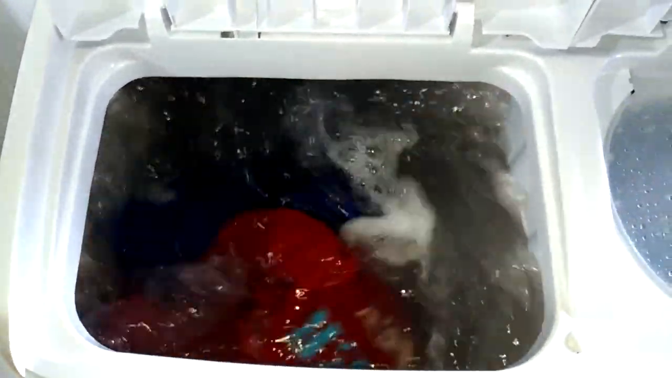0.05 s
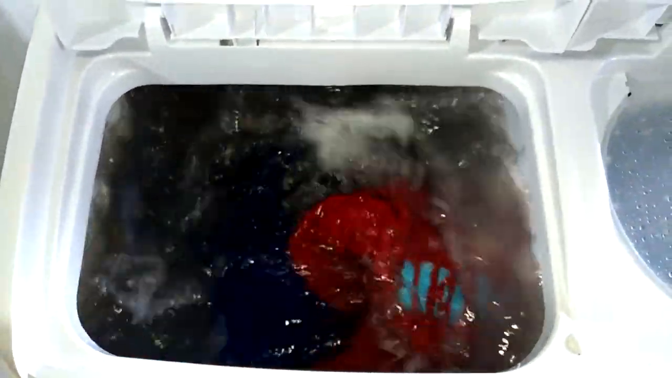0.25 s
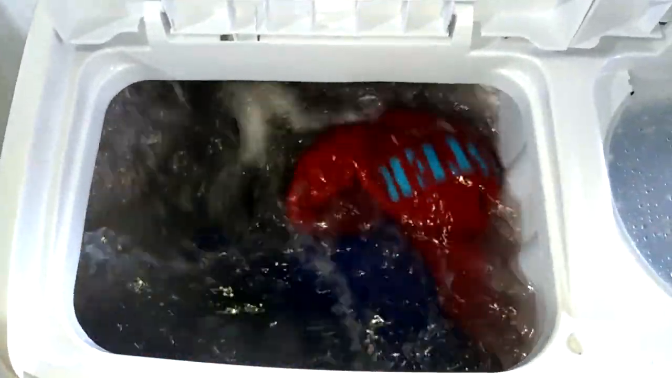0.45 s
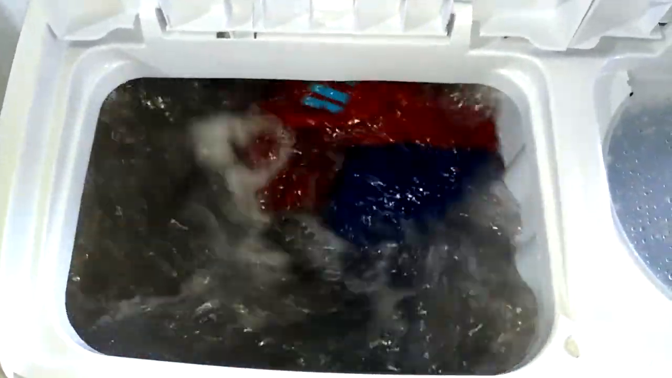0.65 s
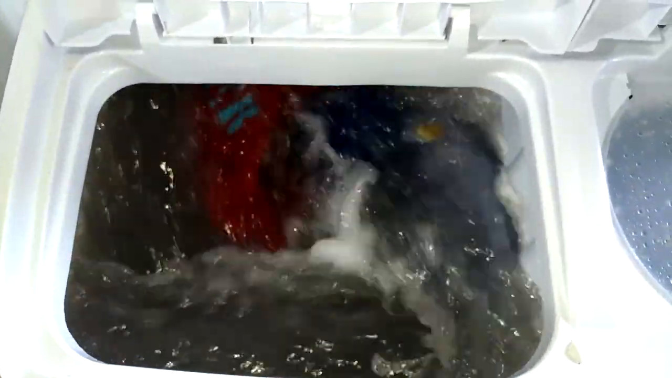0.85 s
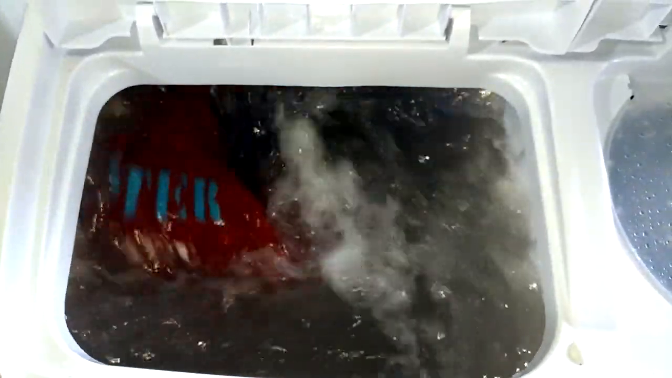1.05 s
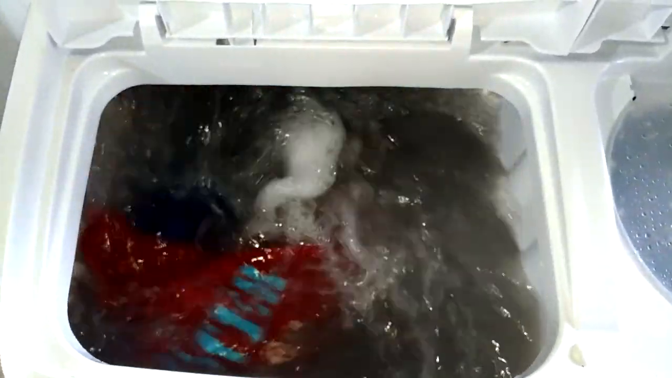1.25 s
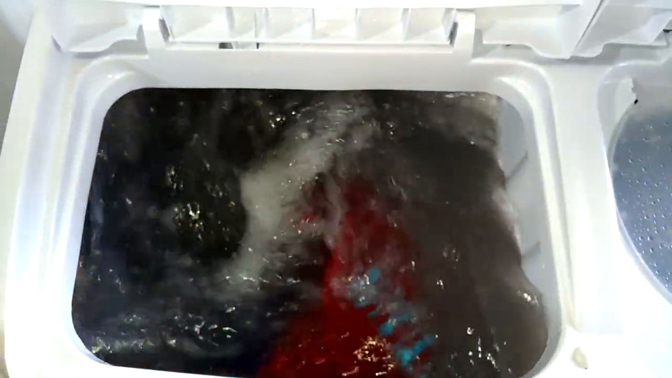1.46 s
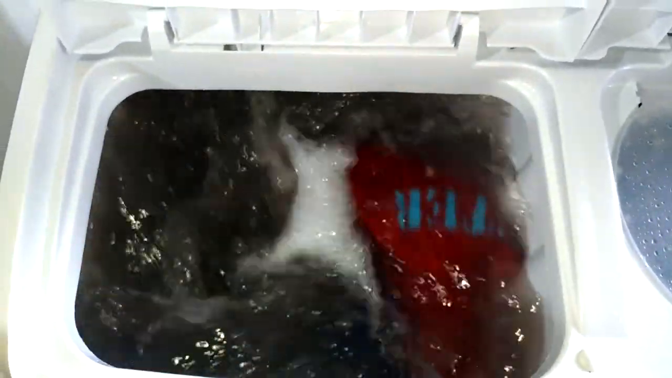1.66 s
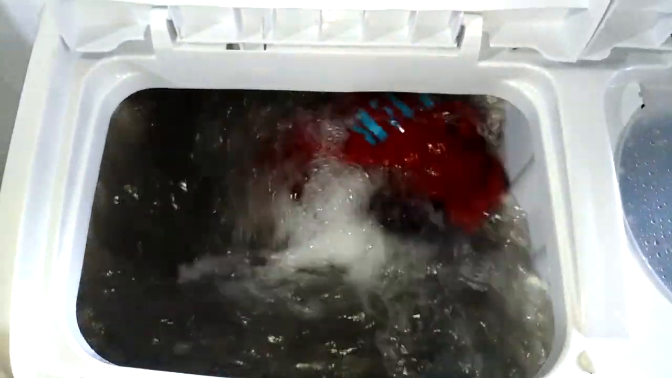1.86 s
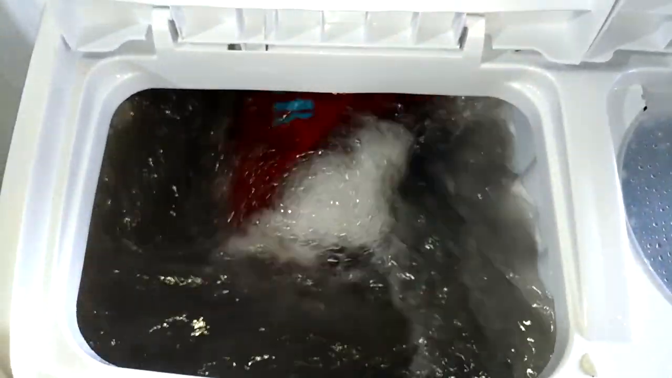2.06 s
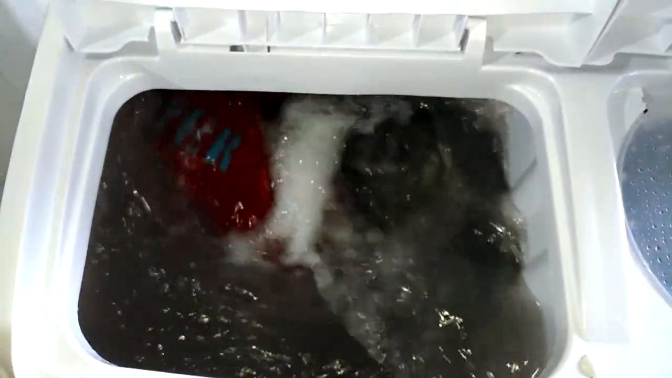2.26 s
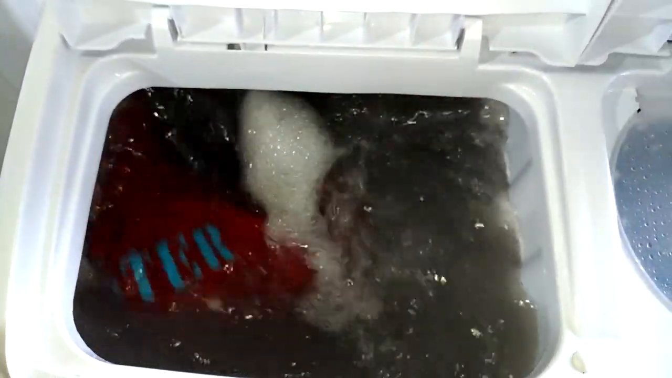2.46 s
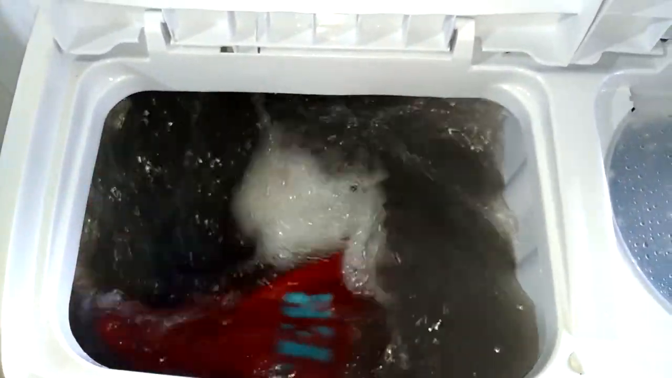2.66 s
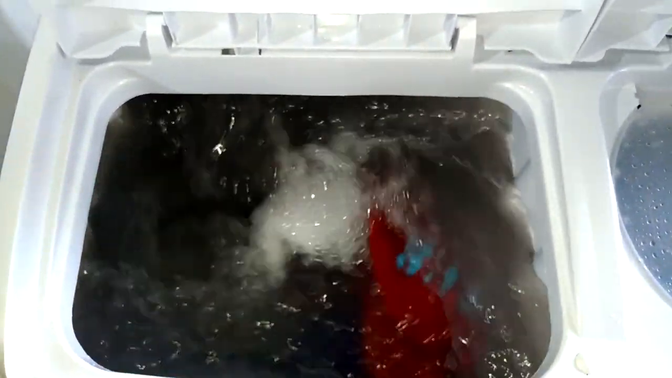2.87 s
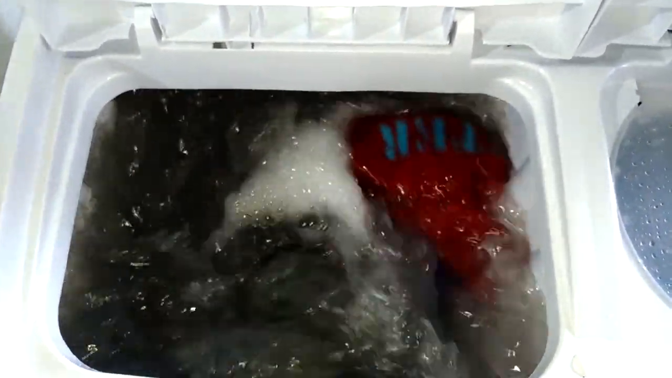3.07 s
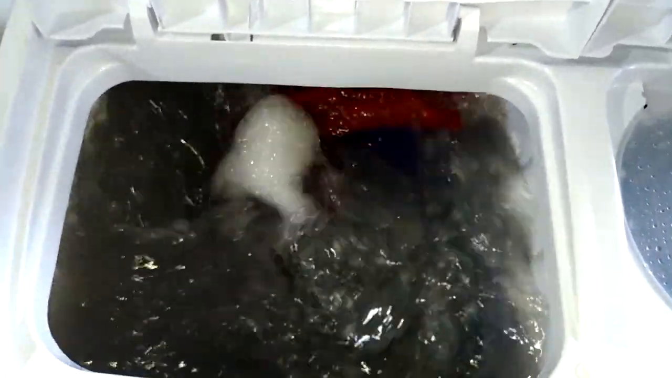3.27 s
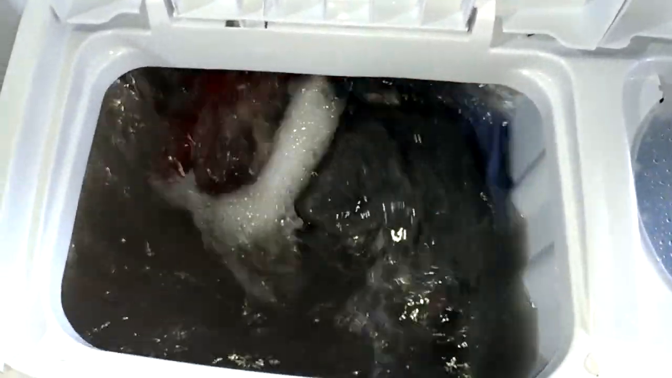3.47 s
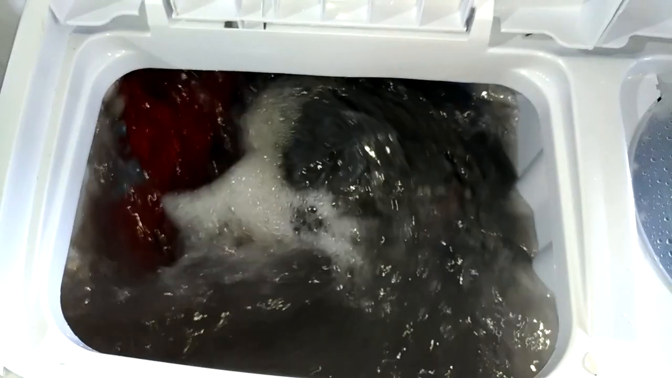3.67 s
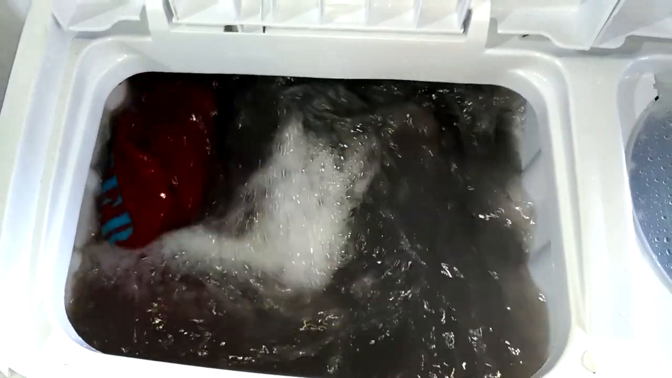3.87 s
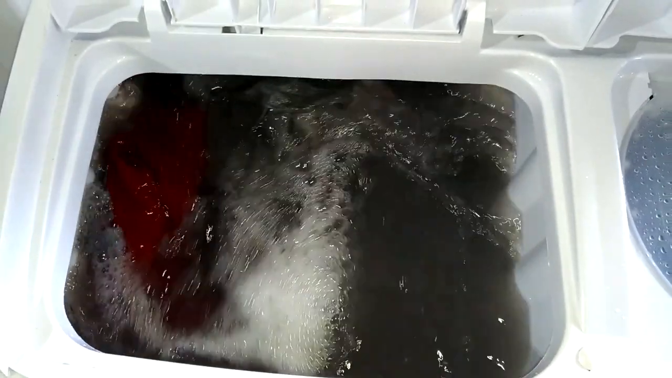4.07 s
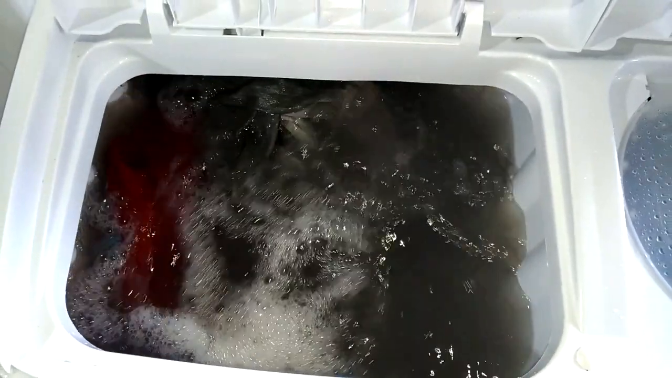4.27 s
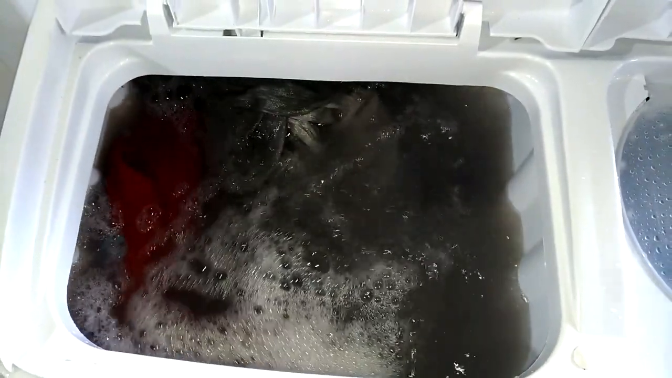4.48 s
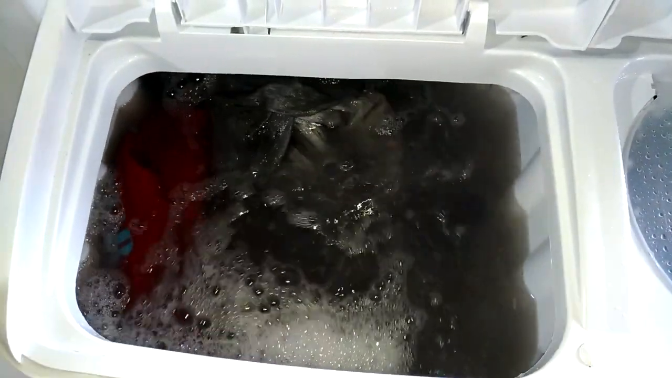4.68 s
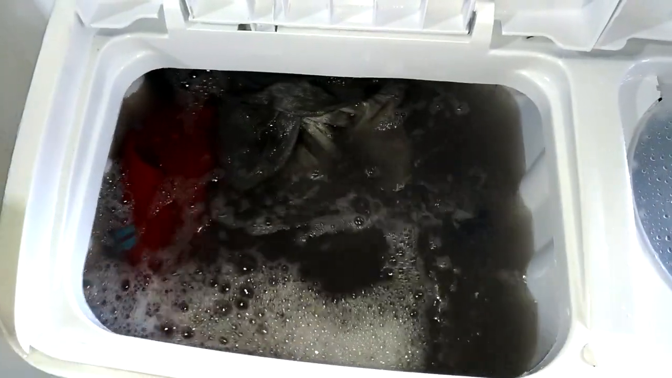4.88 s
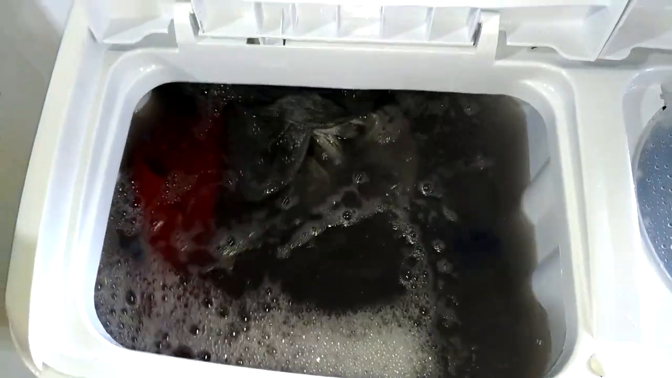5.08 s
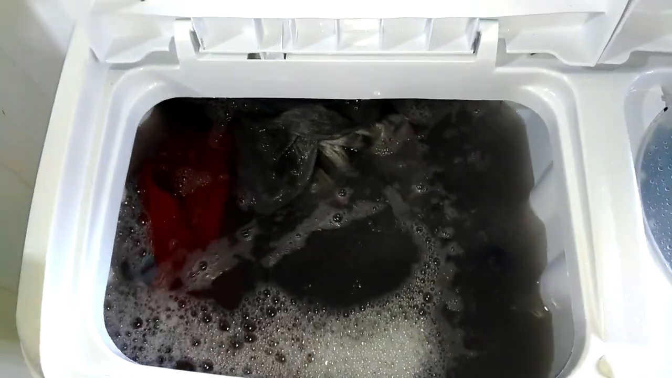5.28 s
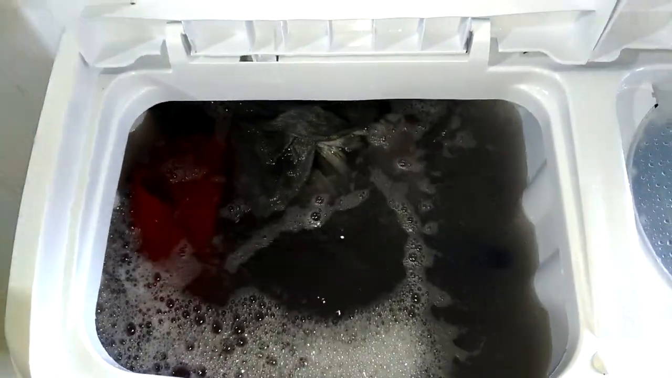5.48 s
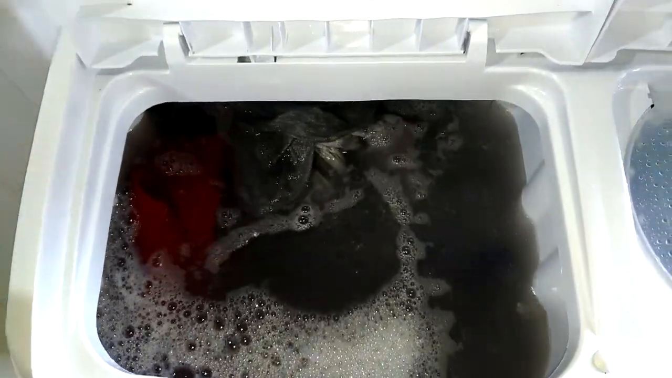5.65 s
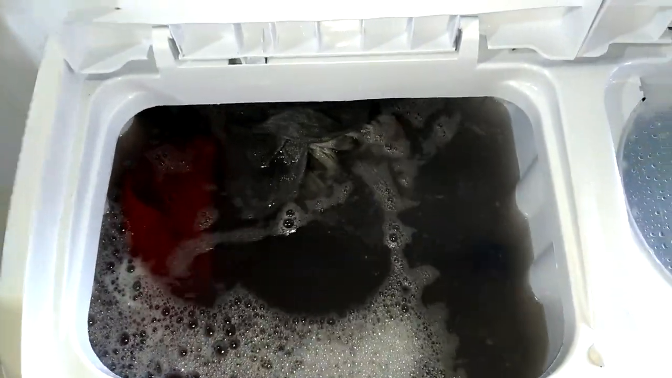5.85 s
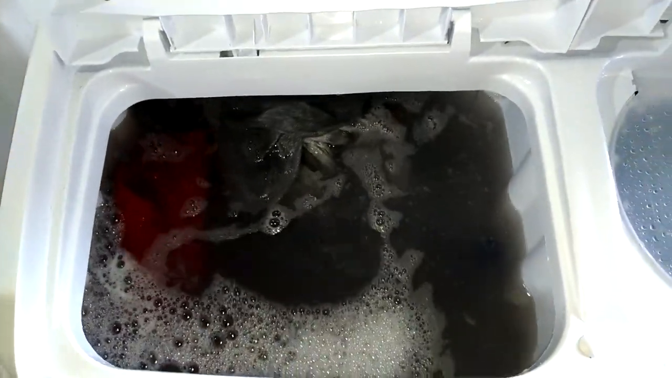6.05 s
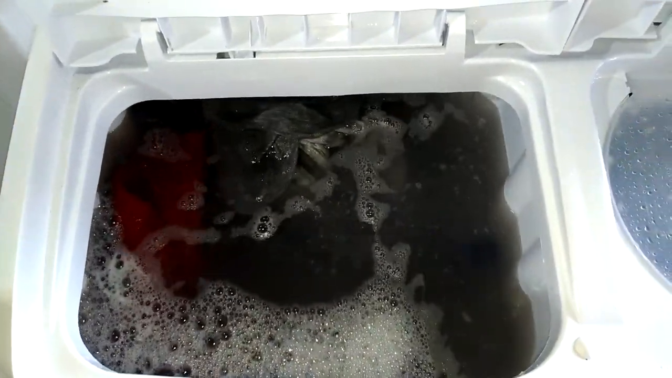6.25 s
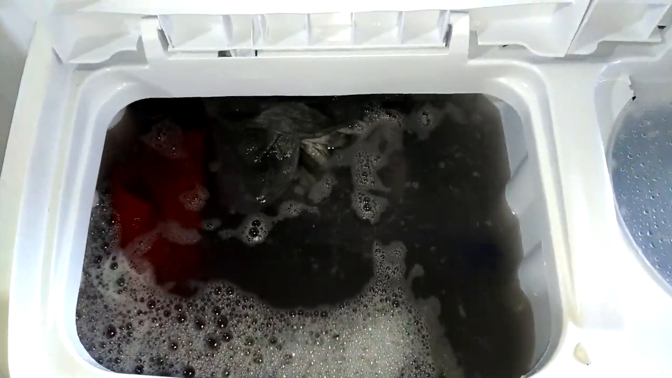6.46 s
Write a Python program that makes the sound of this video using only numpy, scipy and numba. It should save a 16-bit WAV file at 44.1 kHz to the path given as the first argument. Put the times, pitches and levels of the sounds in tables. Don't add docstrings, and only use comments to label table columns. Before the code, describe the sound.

Stereo microphones held just above the tub catch lively, irregular splashing, plops and deep gulps over a motor's hum and cabinet rumble. The motor stops about halfway through; one last heavy slosh follows, then trickles and small drips fade within a second. The rest is nearly silent: soft room air, electric hum, a small distant engine slowly speeding up, and occasional dull taps and scuffs.

```python
import sys
import numpy as np
from scipy import signal
from scipy.fft import rfft, irfft
from scipy.io import wavfile
from numba import njit

SR = 44100
rng = np.random.default_rng(int(sys.argv[2]) if len(sys.argv) > 2 else 0)


def generate_wav(signal):
    frames = np.transpose(np.atleast_2d(signal))
    scaled = np.clip(frames, -1, 1) * 32767
    pcm = np.round(scaled).astype(np.int16)
    wavfile.write(sys.argv[1], SR, pcm)


def how_loud(loudness_db):
    steps = np.asarray(loudness_db, float) / 20
    return 10 ** steps


N = 287532
PORT_LAG = 18


def rms_one(x):
    return x / np.sqrt(np.mean(x ** 2) + 1e-20)


def in_time(rows):
    s, value = np.transpose(rows)
    return np.interp(np.arange(N) / SR, s, value)


def humps(rows):
    t = np.arange(N) / SR
    return sum(db * np.exp(-((t - s) / half_s) ** 2) for s, db, half_s in rows)


def at_hz(points, hz):
    point_hz, value = np.array(points).T
    return np.interp(np.log(hz), np.log(point_hz), value)


def drift(rate):
    r = np.exp(-80 * np.pi * rate / SR)
    slow = signal.lfilter([1], [1, -2 * r, r * r], rng.standard_normal(N // 40 + 2002))[2000:]
    return np.interp(np.arange(N) / 40, np.arange(len(slow)), rms_one(slow))


def band(x, low_hz, high_hz):
    sos = signal.butter(2, [low_hz, min(high_hz, .45 * SR)], "band", fs=SR, output="sos")
    return signal.sosfilt(sos, x)


# frequency in Hz, share common to both ports (0 to 1).
PORT_LIKENESS = [(60, 0.91), (290, 0.96), (640, 0.6), (1400, 0.1), (2200, 0.5), (5000, 0.019),
                 (15000, 0.051)]


def pair_noise(spectrum):
    hz = np.maximum(np.fft.rfftfreq(N, 1 / SR), 1)
    left, other = rfft(rng.standard_normal((2, N)))
    alike = np.clip(at_hz(PORT_LIKENESS, hz), 0, 1)
    late = np.exp(-2j * np.pi * hz * PORT_LAG / SR * np.clip(hz / 1500, 0, 1))
    right = alike * late * left + np.sqrt(1 - alike ** 2) * other
    inside = (hz > .8 * spectrum[0][0]) * (hz < 1.2 * spectrum[-1][0])
    shape = how_loud(at_hz(spectrum, hz)) * inside
    return rms_one(irfft(shape * np.array([left, right]), N))


@njit
def ring_bubbles(out, at, size, hz, cycles, rise, pan, lag, swell, sr):
    for k in range(len(at)):
        tau = cycles[k] * sr / hz[k] / 6.9
        phase = 0.
        for i in range(int(tau * 7)):
            if at[k] + i + lag[k] >= out.shape[1]:
                break
            phase += 2 * np.pi * min(hz[k] * (1 + rise[k] * i / tau) / sr, .45)
            swelling = min(1., i * hz[k] / sr / swell)
            v = size[k] * np.sin(phase) * np.exp(-i / tau) * swelling
            out[0, at[k] + i] += v * pan[k]
            out[1, at[k] + i + lag[k]] += v / pan[k]


def bubbles(at, size, hz, cycles, pan_db, rise, swell=1.08):
    out, chance = np.zeros((2, N)), rng.random((len(at), 3))
    cycles = cycles * (1.34 + 0.91 * chance[:, 0])
    rise = rise * (0.5 + 1.5 * chance[:, 1])
    lag = (chance[:, 2] * PORT_LAG * np.clip(hz / 1500, 0, 1)).astype(int)
    ring_bubbles(out, np.asarray(at, int), size, hz, cycles, rise, how_loud(pan_db / 2), lag, max(swell, .3), SR)
    return out


# frequency in Hz, level in dB per Hz.
CABINET_RUMBLE = [(21, -52), (35, -34), (64, -15), (93, -12.5), (123, -4), (157, -5), (199, -0.5),
                  (301, -12.5), (382, -12.5), (484, -26.5), (552, -22.5), (600, -28), (780, -38),
                  (1320, -120)]
# time in seconds, level in dB against the mean.
MOTOR_LOAD = [(0, -5), (.07, -4), (.44, -0.5), (.53, 3), (.61, -1.5), (.83, -0.5), (1.44, 2), (1.63, 2),
              (1.69, 1), (2.03, 1.5), (2.12, -2), (2.24, 2.5), (2.3, -2.5), (2.42, 3), (2.48, -4),
              (2.55, 3.5), (2.68, -1.5), (3.31, 0.5)]
# time in seconds, change in dB, half width in seconds.
BELT_SLACKS = [(.3, -1, 0.27), (.46, -5.5, 0.077), (.66, -6, 0.11), (.95, -4, 0.032), (1.03, -21, 0.014),
               (1.35, -18, 0.025), (1.41, 6.5, 0.032), (1.47, -5, 0.027), (1.61, -22, 0.053),
               (1.99, -14, 0.016), (2.08, 2, 0.096), (2.24, -20, 0.038), (2.48, -16, 0.015),
               (2.7, -15, 0.12), (2.88, 5, 0.04), (2.99, -18, 0.05), (3.09, 7, 0.02), (3.22, -8, 0.095)]


def motor():
    t, load_db = np.arange(N) / SR, in_time(MOTOR_LOAD)
    off_s = np.maximum(t - 3.307, 0)
    coast_db = -171.5 * off_s
    hum_db = -31 + load_db - 603 * off_s
    rumble_change_db = 0.61 * load_db + coast_db
    tone_db = -29 + humps(BELT_SLACKS) + coast_db

    tone_hz = 188.9 + 1.56 * load_db
    turn = 2 * np.pi * np.cumsum(tone_hz * (1 + 0.011 * drift(7.0))) / SR
    overtone = how_loud(-18.5 + 3.6 * drift(5.1)) * np.sin(2 * turn)
    tone = how_loud(tone_db + 1.0 + 1.7 * drift(26.0)) * (np.sin(turn) + overtone)
    hum = how_loud(hum_db + 3.0) * np.sin(2 * np.pi * 120 * t + 0.58 * drift(20.0))

    panel_hz, panel_width_hz = 250.5, 30
    panel = band(rng.standard_normal(N), panel_hz - panel_width_hz / 2, panel_hz + panel_width_hz / 2)
    panel = how_loud(-45 + rumble_change_db + 2.4 * drift(3.8)) * rms_one(panel)
    rumble = how_loud(-37 + rumble_change_db + 4.0 + 0.91 * drift(14.5)) * pair_noise(CABINET_RUMBLE)
    return tone + hum + panel + rumble


# frequency in Hz, level in dB per Hz.
WATER_COLOUR = [(260, 15), (450, -4), (726, -9), (936, -4.5), (1150, -14), (1280, -4), (1730, -10),
                (2620, -7), (5140, -13.5), (8540, -14), (12600, -30.5), (14600, -31), (16000, -21)]


def swarm(per_s, low_hz, high_hz, cycles, spread_db, clump_db, rise):
    at = np.flatnonzero(rng.random(N) < per_s * how_loud(clump_db * drift(12)) / SR)
    pitch, luck, side, place = rng.random((N, 4))[at].T
    hz = low_hz * (high_hz / low_hz) ** pitch
    size_db = at_hz(WATER_COLOUR, hz) - spread_db * np.log(luck + 0.016)
    size = how_loud(size_db) * hz * np.sign(side - .5)
    return rms_one(bubbles(at, size, hz, cycles, 8 * (place - .5), rise, swell=2.4))


def patchy(sheet, low_hz, high_hz, surge_db, count):
    edges = np.geomspace(low_hz, high_hz, count + 1)
    patches = 0
    for low, high in zip(edges, edges[1:]):
        flicker_db = 2.5 * drift(20.0)
        patches = patches + how_loud(surge_db + flicker_db) * band(sheet, low, high)
    return rms_one(patches)


# time in seconds, level in dB.
WATER_STIR = [(0, -42), (.22, -42), (.52, -37), (.64, -36.5), (.76, -41.5), (.95, -41.5), (1.16, -38),
              (1.33, -42.5), (1.83, -43), (2.09, -44.5), (2.21, -46), (2.8, -48.5), (3.3, -41.5),
              (3.59, -34.5), (3.72, -43.5), (4.05, -54.5), (4.5, -59.5), (6.52, -65)]
# time in seconds, change in dB, half width in seconds.
WAVE_HEAPS = [(.17, -0.5, 0.043), (0.488, 4, 0.025), (.58, 1.5, 0.014), (.72, 3.5, 0.074),
              (0.849, -3.5, 0.04), (1.02, 2, 0.025), (1.25, 0, 0.036), (1.56, 1.5, 0.029),
              (1.76, 2.5, 0.059), (1.95, 2.5, 0.061), (2.08, -3, 0.042), (2.14, 3.5, 0.0082),
              (2.3, -1, 0.059), (2.53, 0.5, 0.042), (2.64, 0.5, 0.027), (2.76, 1.5, 0.036),
              (2.91, 0.5, 0.044), (3.07, 0.5, 0.018), (3.18, -1, 0.054), (3.26, 1.5, .03),
              (3.37, -2.5, 0.037), (3.52, -0.5, .03), (3.79, -3, 0.015), (3.9, -8, 0.017), (3.95, 4, 0.052),
              (4.24, 3.5, 0.045), (4.9, 3, 0.11), (5.42, 5.5, 0.039)]


def churn():
    slosh_db = in_time(WATER_STIR) + humps(WAVE_HEAPS)
    swing_db = slosh_db + 45
    gurgle_db = -48 + 1.135 * swing_db
    spray_db = -50.5 + 0.96 * swing_db
    sheet, surge = pair_noise(WATER_COLOUR), drift(12)
    gurgles = swarm(240, 600, 1800, 22, 2.5, 3, .06)
    tinkles = swarm(600, 1700, 4500, 34, 3, 4, .04)
    fizz = swarm(1800, 5000, 15000, 30, 4.5, 3, .015)
    gurgle = how_loud(-3.0) * patchy(sheet, 509, 1600, 2.1 * surge, count=3) + how_loud(-3.5) * gurgles
    slosh = how_loud(-5.0) * patchy(sheet, 1710, 4960, 1.4 * surge, count=3) + how_loud(-4.0) * tinkles
    spray = how_loud(3.0) * patchy(sheet, 4380, 22900, 1.9 * surge, count=4) + how_loud(-2.5) * fizz
    return how_loud(gurgle_db + 2.0) * gurgle + how_loud(slosh_db + 2.5) * slosh + how_loud(spray_db) * spray


# start in seconds, peak in dB, pitch in Hz, left over right in dB.
LARGE_BUBBLES = [(.034, -17, 1550, 7), (.065, -18.5, 905, 0), (.126, -29, 804, -2), (.218, -21, 940, -1),
                 (.282, -18.5, 591, 6), (.318, -13.5, 1484, 3), (.405, -14.5, 996, -6),
                 (.461, -16, 1370, 1), (.475, -23, 537, -2), (.572, -24, 517, 8), (.636, -19, 1210, 12),
                 (.747, -30, 680, 6), (.9, -25, 565, 4), (1.261, -18.5, 755, -3), (1.482, -16, 1470, 0),
                 (1.564, -23, 874, -1), (1.744, -18.5, 1570, 9), (2.626, -27.5, 935, 1.5),
                 (2.99, -14.5, 1630, 7.5), (2.996, -33, 505, 3), (3.044, -13, 708, 4.5),
                 (3.266, -16, 1500, 16), (3.417, -11.5, 850, 2), (3.425, -22.5, 620, -1),
                 (3.363, -28, 930, 0), (3.695, -31, 920, 0), (.658, -24, 900, 0), (.497, -27, 960, 0),
                 (.51, -19, 1260, 0), (.309, -24.5, 800, 0), (.41, -21, 1400, 0), (3.462, -14.5, 1760, 2),
                 (3.474, -18, 1800, -14), (3.529, -32, 1270, 2), (3.573, -22, 856, 7),
                 (3.575, -15, 1300, 0), (3.653, -30.5, 915, 0), (3.72, -18, 1310, 5),
                 (3.872, -26.5, 930, 1)]
# start in seconds, peak in dB, first pitch in Hz,
# share of that pitch climbed per decay time.
GLIDING_BUBBLES = [(.138, -21.5, 800, 0.09), (0.19, -34.5, 802, 0.088), (0.98, -38, 1500, 0.038),
                   (1.1, -23, 2300, 0.11), (1.27, -33, 560, 0.06), (3.059, -21.5, 1070, 0.43),
                   (2.8, -31, 530, 0.045), (3.6, -26.5, 1050, 0.013), (3.583, -20, 780, 0.033),
                   (3.9, -35, 1250, 0.027), (.63, -32, 1200, .02), (.04, -29.5, 1100, .08)]
# start in seconds, peak in dB, pitch in Hz.
LAST_DRIPS = [
    (3.7444, -34, 2530),
    (3.8687, -35, 3350),
    (3.9298, -36, 1900),
    (4.003, -39, 2470),
    (4.0422, -42, 2690),
    (4.119, -41, 2300),
    (4.312, -36.5, 2320),
]
# start in seconds, peak in dB, pitch in Hz.
SMALL_BUBBLES = [(0.875, -48, 890), (0.9, -35, 1390), (0.928, -33, 1500), (0.997, -39, 1000),
                 (1.086, -36, 1240), (1.121, -31, 1890), (1.172, -32, 1410), (1.257, -39, 810),
                 (1.364, -48, 880), (1.407, -33, 1630), (1.455, -35, 960), (1.483, -33, 1500),
                 (1.563, -42, 865), (1.666, -33, 1550), (1.745, -33, 1520), (1.818, -37, 1220),
                 (1.87, -37, 1990), (1.976, -42, 960), (2.022, -33.5, 820), (2.13, -40, 1240),
                 (2.177, -40, 802), (2.479, -31, 1280), (2.537, -43, 1850), (2.585, -38, 1290),
                 (2.627, -39, 940), (2.741, -40, 1160), (2.896, -47, 813), (2.957, -37, 2000)]
# start in seconds, peak in dB, pitch in Hz.
DEEP_GULPS = [
    (0.268, -20, 430),
    (1.488, -25.5, 292),
    (2.132, -23, 309),
    (2.575, -24.5, 436),
    (2.998, -25.5, 428),
    (3.164, -33, 432),
    (3.299, -25, 370),
    (3.5, -23, 322),
    (3.536, -21, 398),
]


def plops():
    s, db, hz, pan_db = np.transpose(LARGE_BUBBLES)
    out = bubbles(s * SR, how_loud(db - 7.0), .95 * hz, 22.8, pan_db, 0.0525, swell=2.15)
    s, db, hz, climb = np.transpose(GLIDING_BUBBLES)
    out += bubbles(s * SR, how_loud(db), hz, 41.2, 0 * s, climb, swell=6.6)
    s, db, hz = np.transpose(LAST_DRIPS)
    out += bubbles(s * SR, how_loud(db + 4.0), hz, 18.0, 0 * s, 0.03, swell=2.5)
    s, db, hz = np.transpose(SMALL_BUBBLES)
    out += bubbles(s * SR, how_loud(db + 8.0), 1.4 * hz, 25.0, 0 * s, 0.038, swell=1.6)
    s, db, hz = np.transpose(DEEP_GULPS)
    return out + bubbles(s * SR, how_loud(db + 1.5), hz, 17, 0 * s, .02)


def spray_bursts(sheet, at_s, db, low_hz, high_hz, fall_s):
    kicks = np.zeros(N)
    kicks[((at_s - .001) * SR).astype(int)] = how_loud(db)
    burst = signal.lfilter([1], [1, -np.exp(-1 / (fall_s * SR))], kicks + 1e-18)
    quick = np.exp(-1 / (0.001 * SR))
    burst = signal.lfilter([1 - quick], [1, -quick], burst)
    return burst * rms_one(band(sheet, low_hz, high_hz))


# start in seconds, peak in dB, ring in Hz, left over right in dB.
WALL_SLAPS = [(0.0186, -24.5, 2130, 0.5), (0.119, -21, 3100, 6), (.2738, -24.5, 2090, -13),
              (.3516, -18.5, 2300, 8), (.458, -31, 3630, -1), (0.6767, -10.5, 2800, 6),
              (1.1096, -22, 2510, 34), (1.1955, -25.5, 3220, -2), (1.319, -16, 3670, -9),
              (1.505, -22, 2100, -1), (1.6783, -23, 2120, 7), (1.8683, -22, 2180, 2),
              (1.945, -28, 7060, -14), (2.1709, -21, 3240, -11.5), (2.2358, -26.5, 2383, 4),
              (2.536, -20, 3700, -5), (2.718, -22, 6000, 14), (2.7626, -28, 4240, 3),
              (2.9984, -28, 3200, 1), (3.1116, -26, 2460, -8), (3.24, -20.5, 8800, 6),
              (3.279, -21.5, 2600, 6.5), (3.3, -19, 2440, 12), (3.462, -27, 2770, -10),
              (3.5034, -15, 4280, -13.5), (3.533, -26, 3100, -14), (3.6215, -27.5, 4930, 29),
              (3.666, -21, 3940, -3), (3.681, -22, 2780, 4), (3.8211, -34.5, 8360, -34.5)]
# start in seconds, peak in dB, ring in Hz, left over right in dB.
CREST_BURSTS = [(0.039, -25.5, 3920, 0), (0.0834, -31.5, 8000, -20), (.3091, -21, 2230, 6),
                (0.4758, -30, 2600, -11), (0.492, -23, 3530, -1), (0.571, -28, 2170, 4),
                (0.607, -25.5, 9150, -18), (0.66, -20, 6300, 23), (0.9956, -26.5, 2470, 1),
                (1.0806, -34, 2335, -5), (1.474, -26, 2540, 8), (1.5474, -29, 2130, 9),
                (1.66, -29, 2600, -7), (1.7356, -25.5, 2220, -1.5), (1.958, -27, 6200, 1),
                (1.9908, -23.5, 1990, 12), (2.142, -48, 7300, -2), (2.1317, -24, 2420, 2),
                (2.205, -28, 3850, 2), (2.509, -29, 2940, 8), (2.7936, -28.5, 3920, -2),
                (3.043, -32.5, 2370, 2), (3.2494, -26.5, 2200, 4), (3.433, -22.5, 2600, -2),
                (3.492, -31, 3900, -3), (3.5588, -40, 2620, -2), (3.597, -30.5, 3160, -18),
                (3.8052, -28, 3100, -1), (3.9554, -38, 2940, -13), (4.2097, -30.5, 3280, -10)]
# start in seconds, peak in dB, ring in Hz, left over right in dB.
SPRAY_SPITS = [(0.154, -29, 2480, -2), (0.213, -41, 3030, 3), (0.3744, -27, 3010, -2),
               (0.5554, -27, 3060, -9), (0.574, -24, 4900, -5), (0.5894, -27, 4190, -18),
               (0.719, -23, 2600, 1), (0.7594, -25, 2580, -1), (0.8244, -31, 2610, -4),
               (0.8794, -26.5, 4130, 1), (1.022, -30.5, 2790, -1), (1.31, -34, 3550, 13),
               (1.4437, -27, 2670, 6), (1.5303, -25, 2540, 1), (1.629, -29, 4900, -1),
               (1.7984, -33, 5400, 1), (2.08, -35, 4900, -18), (2.3524, -38, 2550, 3),
               (2.4014, -32, 2580, 7), (2.4716, -31.5, 4500, -3.0), (2.904, -29.5, 3560, -1),
               (2.9716, -32, 3300, 2), (3.1444, -33, 3600, -3.5), (3.3772, -24.5, 3120, 3),
               (3.5194, -20.5, 4560, -5.0), (3.5794, -25, 2620, 4), (3.752, -29.5, 2510, 2),
               (3.8733, -35.5, 3300, -12), (3.9285, -44, 2980, 3), (4.0013, -34, 2480, -6.0),
               (4.1061, -45, 2820, -6), (4.247, -39.5, 2880, -12)]
# start in seconds, peak in dB.
FINE_MIST = [(0.0378, -33), (0.0842, -33), (0.1555, -48), (0.2145, -34), (0.3107, -30.5), (0.3536, -38),
             (0.4449, -36), (0.4888, -23), (0.605, -25), (0.6469, -32), (0.6604, -27), (0.6784, -32),
             (0.8385, -34), (0.8714, -36), (0.9936, -35), (1.2166, -32), (1.3169, -41), (1.408, -32.5),
             (1.472, -27), (1.5479, -26.5), (1.6003, -34), (1.736, -40), (1.751, -29), (1.7948, -41),
             (1.9679, -38), (1.9886, -29), (2.133, -34), (2.2054, -34), (2.5082, -39), (2.5371, -34),
             (2.7167, -38), (2.7626, -33.5), (2.7965, -38), (2.9065, -32), (3.0719, -34), (3.0969, -35),
             (3.2231, -37), (3.239, -33.5), (3.2984, -34), (3.3697, -39), (3.4331, -32), (3.4635, -33),
             (3.496, -29), (3.5279, -37), (3.5748, -39), (3.5957, -30), (3.8043, -41), (3.8202, -37),
             (3.931, -45), (4.2108, -33.5)]


def splats():
    s, db, hz, pan_db = np.transpose(WALL_SLAPS + CREST_BURSTS + SPRAY_SPITS)
    counts = [len(WALL_SLAPS), len(CREST_BURSTS), len(SPRAY_SPITS)]
    top_db = db + np.repeat([-12.5, -3.5, -8.5], counts)
    out = bubbles(s * SR, how_loud(db - 6.0), hz, 30.0, pan_db - 10.5, 0.0035, swell=3.4)
    out += bubbles(s * SR, how_loud(db + 2.5), hz, 5.4, pan_db - 3, 0.033)
    sheet = pair_noise(WATER_COLOUR)
    mist_s, mist_db = np.transpose(FINE_MIST)
    out += spray_bursts(sheet, s, db - 13.5, 1400, 5000, fall_s=.011)
    out += spray_bursts(sheet, s, top_db + 2.0, 4000, 9000, fall_s=.004)
    out += spray_bursts(sheet, s, top_db - 4.5, 9000, 17000, fall_s=.003)
    return out + spray_bursts(sheet, mist_s, mist_db - 3.0, 8000, 17000, fall_s=.0035)


def tub(x, t60):
    t = np.arange(int(t60 * SR)) / SR
    tail = rng.standard_normal((2, len(t))) * how_loud(-60 * t / t60) * (t > .0012)
    tail = tail / np.sqrt((tail ** 2).sum(axis=1, keepdims=True))
    return signal.fftconvolve(x, tail, axes=1)[:, :N]


# frequency in Hz, level in dB per Hz.
ROOM_AIR = [(18, -52), (32, -32), (58, -1), (100, -8), (150, -4), (200, -10), (300, -7), (470, -16.5),
            (700, -17.5), (1300, -24.5), (2500, -28.5), (4500, -34), (8600, -37), (9700, -47), (13300, -45),
            (14800, -46.5), (16000, -41)]
# frequency in Hz, level in dB.
MAINS_HUM = [(60, -60), (119.9, -46), (320, -63.5), (599.8, -60.5), (622, -96)]
# peak time in seconds, level in dB, lowest and highest frequency in Hz,
# rise and fall in seconds.
FAR_SCUFFS = [
    (4.71, -46, 420, 600, .02, .04),
    (5.02, -47, 600, 3000, .025, .035),
    (5.94, -49, 1280, 1420, .008, .04),
    (6.0, -56, 4200, 4600, .01, .03),
    (6.26, -43, 900, 7500, .022, .05),
    (6.28, -46, 900, 2800, .03, .04),
]


def room():
    t, air = np.arange(N) / SR, pair_noise(ROOM_AIR)
    out = how_loud(-44 + .9 * drift(2.5)) * air
    for hz, db in MAINS_HUM:
        out = out + how_loud(db + 1.5 + 0.35 * drift(35)) * np.sin(2 * np.pi * hz * t - 1.2)
    hiss = pair_noise([(200, 0), (12000, -14)])
    for s, db, low_hz, high_hz, rise_s, fall_s in FAR_SCUFFS:
        shape = np.exp(np.where(t < s, (t - s) / rise_s, (s - t) / fall_s))
        out = out + how_loud(db) * shape * rms_one(band(hiss, low_hz, high_hz))
    return out


# frequency in Hz, level in dB, seconds to fall 60 dB, lag in seconds.
EXHAUST_RINGS = [(255, -7, .06, -.024), (318, 0, .055, -.016), (410, 2, .045, -.003), (530, -9, .05, -.020)]


def engine():
    t = np.arange(N) / SR - 3.8
    firings_per_s, speeds_up_per_s2 = 15.59, .79
    cycles = .4 + firings_per_s * t + speeds_up_per_s2 / 2 * np.maximum(t, 0) ** 2
    fired = np.flatnonzero(np.diff(np.floor(cycles)))
    out = np.zeros(N)
    for hz, mode_db, t60, lag_s in EXHAUST_RINGS:
        late, uneven = rng.standard_normal((200, 2))[:len(fired)].T
        at = fired + (SR * (lag_s + .0016 * late)).astype(int)
        puffs = np.zeros(N)
        puffs[np.clip(at, 0, N - 1)] = how_loud(mode_db + 1.6 * uneven)
        puffs = band(puffs, 0.888 * hz, 1.134 * hz) / hz
        r, w = how_loud(-60 / (t60 * SR)), 2 * np.pi * hz / SR
        out += signal.lfilter([0, np.sin(w)], [1, -2 * r * np.cos(w), r * r], puffs)
    return how_loud(-49.6) * rms_one(out)


def scene():
    drops = band(plops() + splats(), 160, 19000)
    echoes = how_loud(-7) * tub(band(drops, 800, 16000), t60=.08)
    return motor() + churn() + drops + echoes + room() + engine()


def top_cut(x):
    return signal.sosfilt(signal.butter(12, 15900, fs=SR, output="sos"), x)


# frequency in Hz, left over right in dB.
PORT_COLOUR = [(60, -1.3), (380, 1.2), (700, 0), (1290, 3), (2380, -7.5), (4400, -1.5), (8120, -6.5),
               (15000, 15.5)]


def record(dry):
    tilt_db = at_hz(PORT_COLOUR, np.maximum(np.fft.rfftfreq(N, 1 / SR), 1)) / 2
    mix = irfft(rfft(dry) * how_loud(np.array([tilt_db, -tilt_db])), N)
    mix = signal.sosfilt(signal.cheby2(10, 50, 16300, fs=SR, output="sos"), mix)
    return top_cut(mix)


dry = scene()
out = record(dry)
generate_wav(out)
```